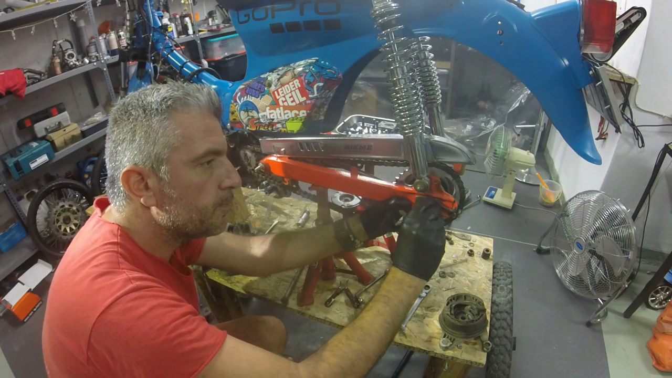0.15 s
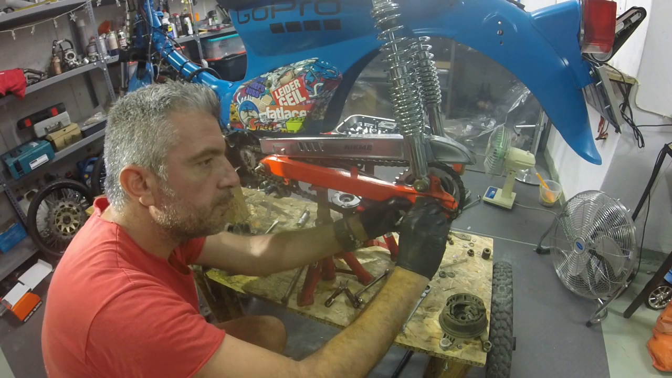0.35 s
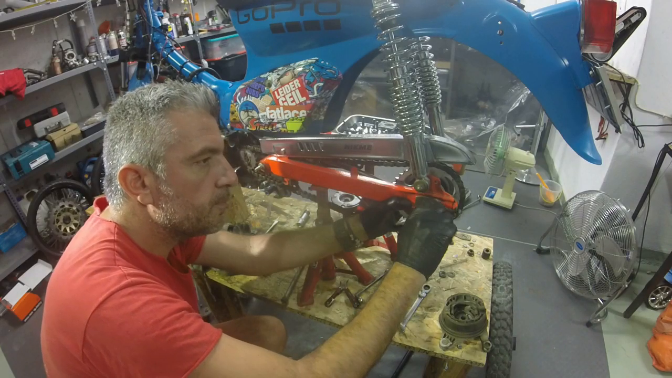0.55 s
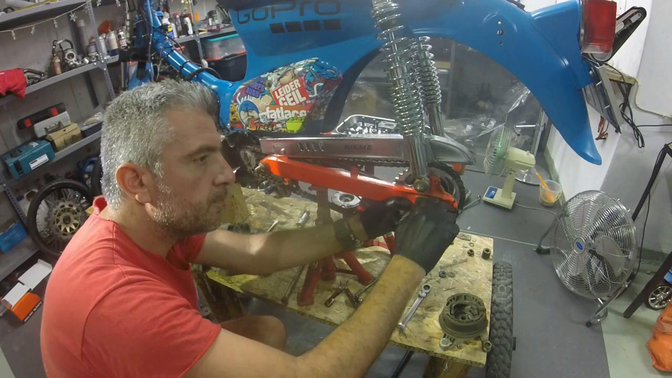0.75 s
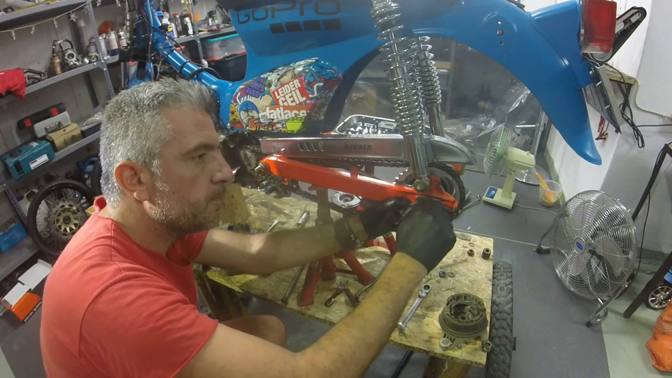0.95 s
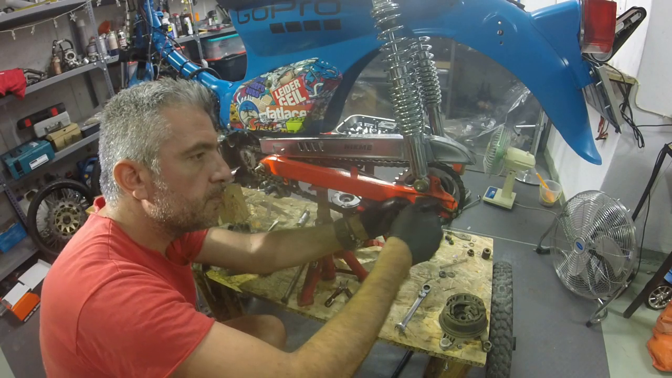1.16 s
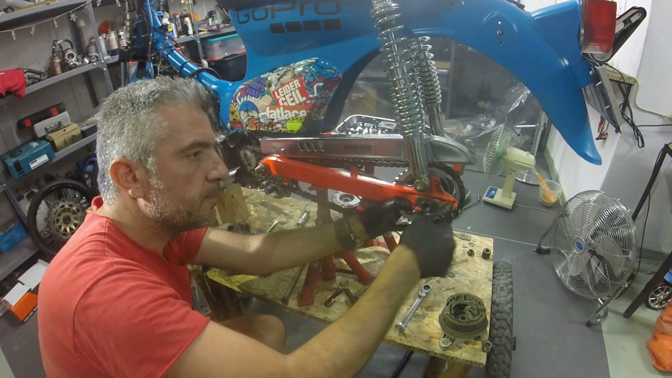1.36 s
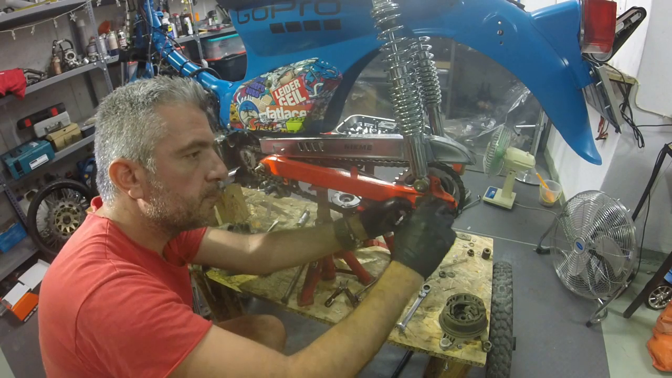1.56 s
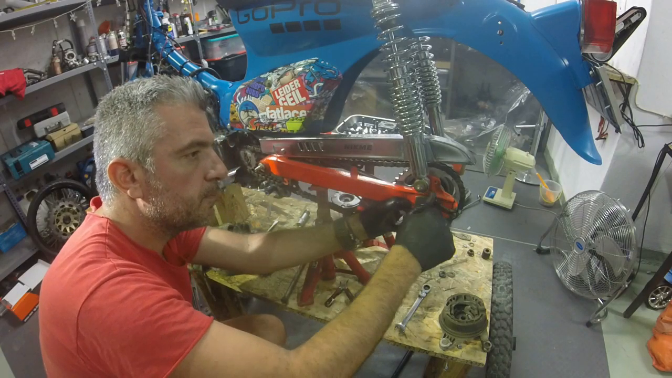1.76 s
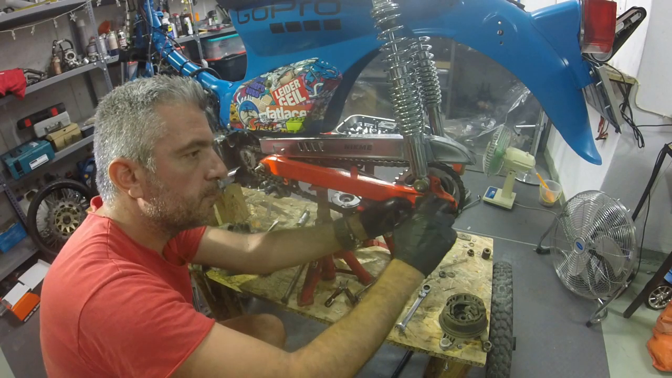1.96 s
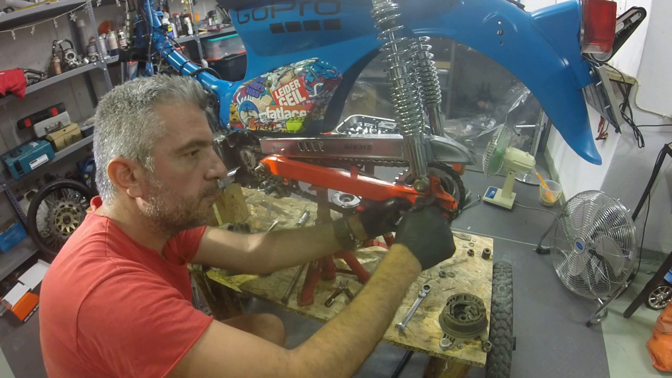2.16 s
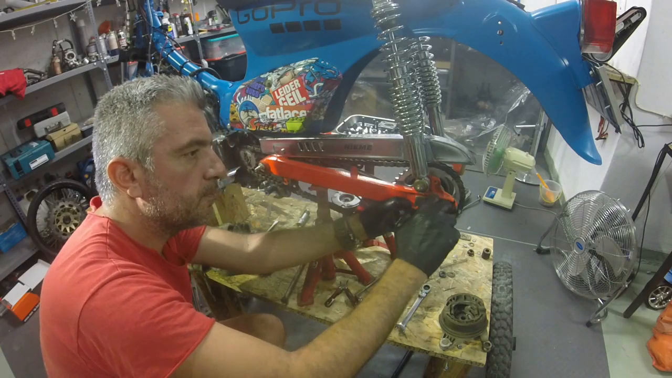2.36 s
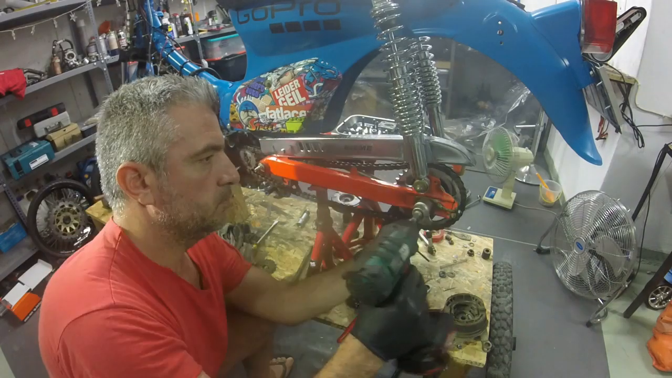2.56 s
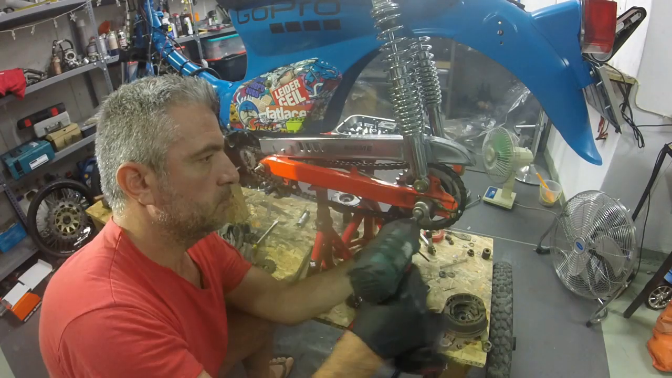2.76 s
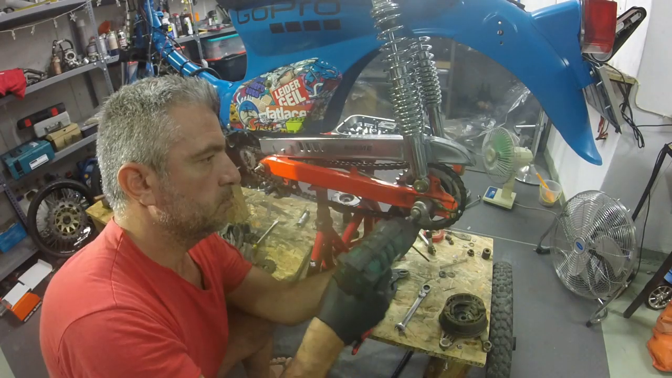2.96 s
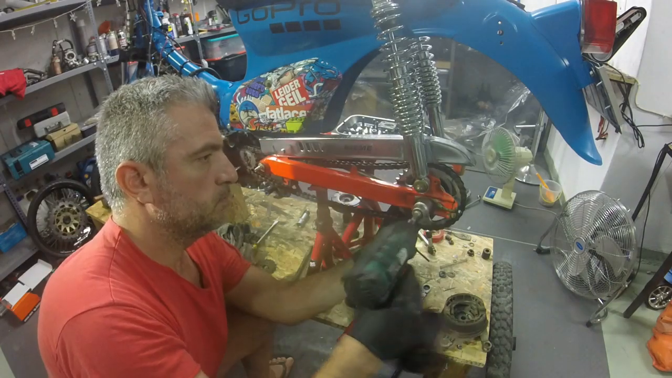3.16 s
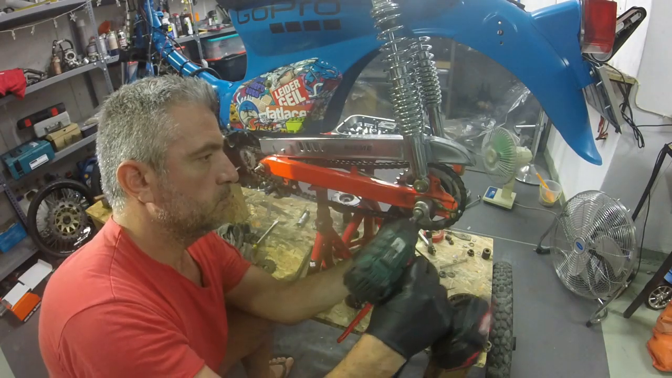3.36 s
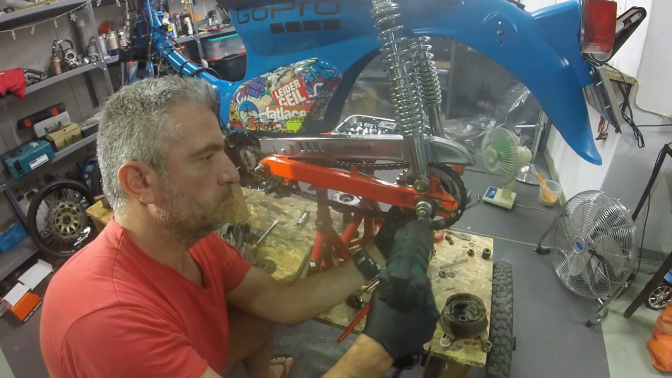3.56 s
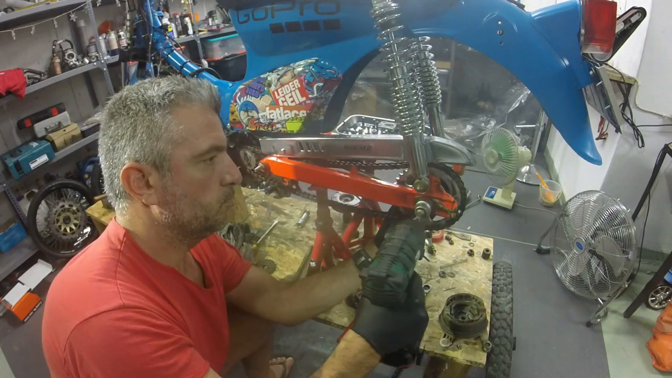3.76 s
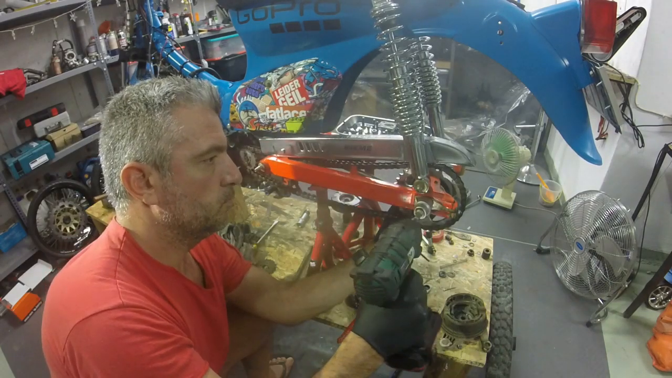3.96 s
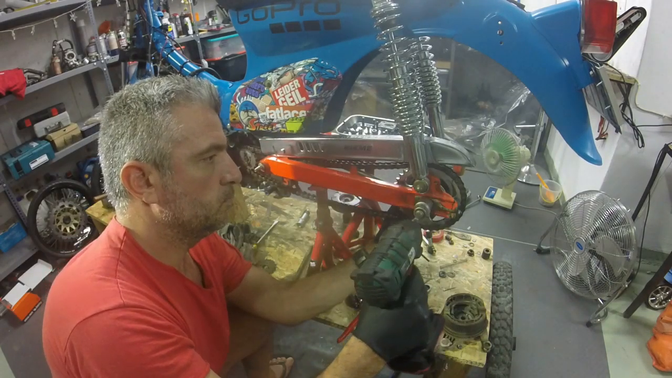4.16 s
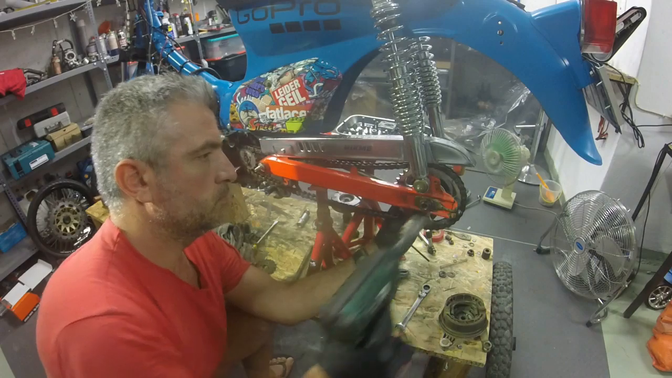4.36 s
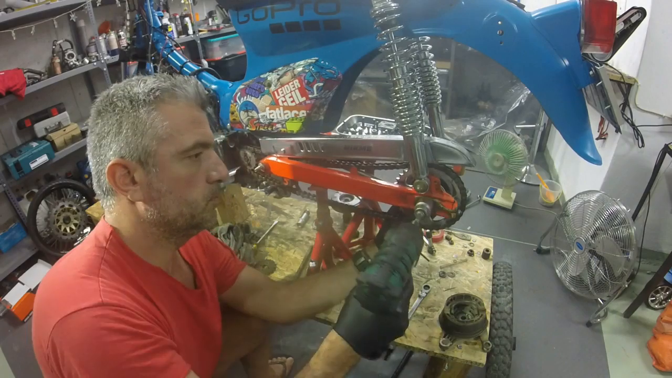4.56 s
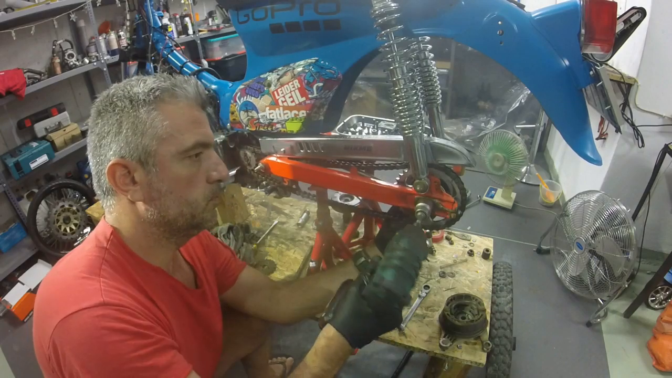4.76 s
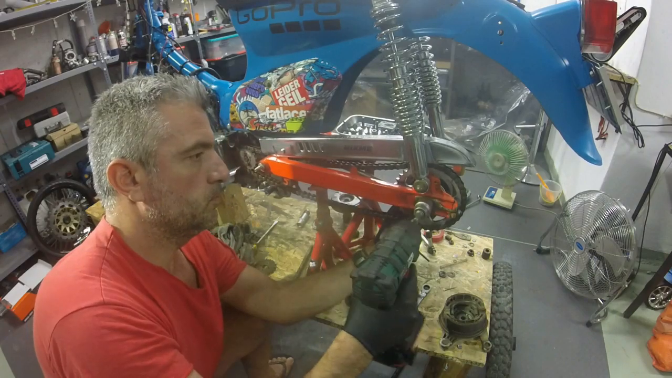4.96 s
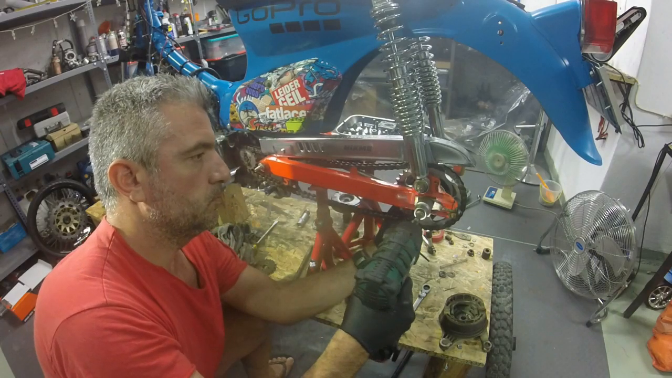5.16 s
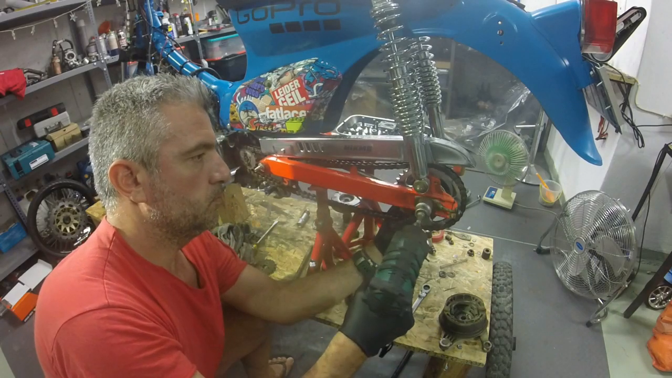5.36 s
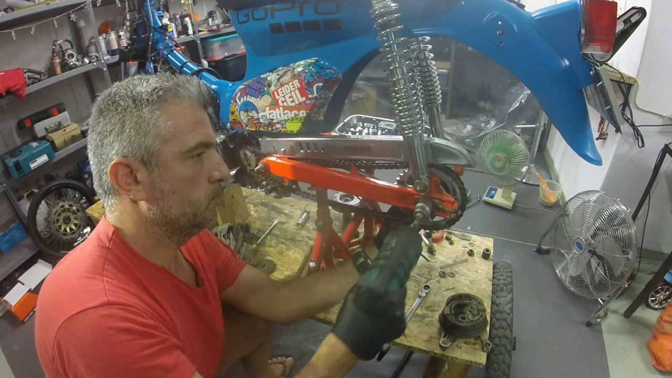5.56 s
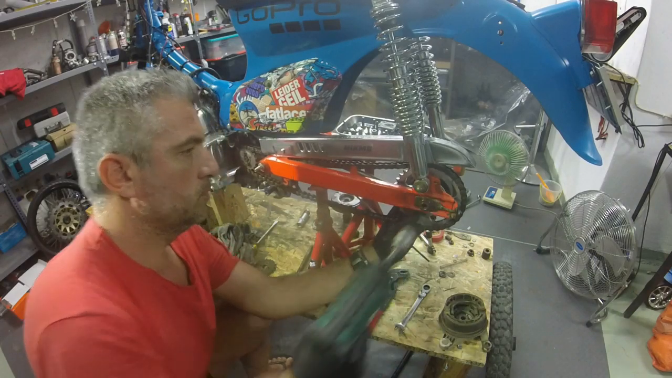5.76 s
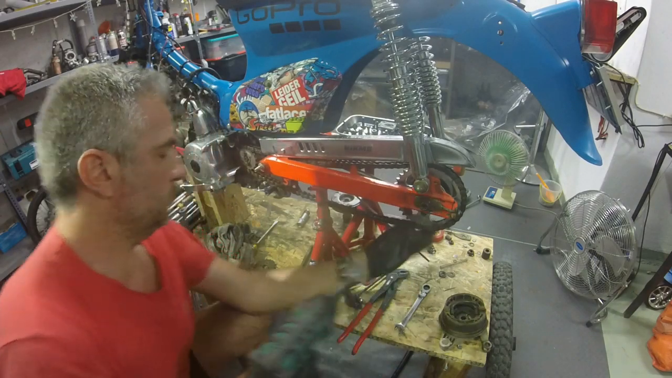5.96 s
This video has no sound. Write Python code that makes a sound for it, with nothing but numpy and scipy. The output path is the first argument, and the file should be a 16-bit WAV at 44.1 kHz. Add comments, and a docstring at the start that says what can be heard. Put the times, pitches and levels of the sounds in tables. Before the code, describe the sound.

A spanner snaps sharply on a motorcycle chain adjuster, with light ticks, faint scrapes and one bright clink. A cordless impact wrench knocks against the axle nut and fires a very short, loud burst of steel hammering with whirring gears. The socket clacks on again and a second brief burst follows. Metal parts ring after each, the hard workshop walls echo the cracks, and a fan runs quietly behind.

```python
"""A cordless impact wrench hammers twice, briefly, on the rear axle nut of a small motorcycle.
Its gears whirr, each blow cracks steel on steel, and the swingarm and wheel ring on.
Before that, a spanner clicks and scrapes on the chain adjuster; ahead of each burst the wrench
knocks about as it is fitted on the nut. The hard walls of the workshop throw back the cracks,
and a fan runs in the background."""
import sys
import numpy as np
from scipy import signal
from scipy.fft import rfft, irfft
from scipy.io import wavfile
from scipy.ndimage import uniform_filter1d

SR = 44100
rng = np.random.default_rng(int(sys.argv[2]) if len(sys.argv) > 2 else 0)


def inscribe(sig):
    """Save sig as 16-bit PCM at rate SR to the path in sys.argv[1].

    A 1-D sig is mono; a 2-D sig holds one channel per row.
    Samples are clipped to [-1, 1] before scaling.
    """
    pcm = np.round(np.clip(np.atleast_2d(sig).T, -1, 1) * 32767)
    wavfile.write(sys.argv[1], SR, pcm.astype(np.int16))


N = 265482
TIME = np.arange(N) / SR

# the wrench knocks against nut and swingarm: start_s, level_db, t60_s, tilt_db_per_octave
WRENCH_KNOCKS = [(2.836, -35, 0.025, 2.5), (3.223, -32, .06, 4), (3.2342, -20, 0.038, 0.3),
                 (3.2375, -19.5, 0.049, -0.7), (3.292, -28, 0.019, -2), (3.4437, -28.5, 0.037, -0.2),
                 (3.4695, -38, .04, 1), (3.504, -29, .025, -2.3), (3.645, -43.5, .035, .8),
                 (4.5515, -33, 0.077, 1), (4.728, -26, 0.034, -0.5), (4.753, -21, 0.027, 0),
                 (4.764, -31, .04, -3)]


def from_db(db):
    """Decibels to gain."""
    return 10 ** (np.asarray(db) / 20)


def rms_one(x):
    """Scale to unit rms."""
    return x / np.sqrt(np.mean(x ** 2) + 1e-20)


def in_time(points):
    """Draw an automation curve through (time_s, value) points."""
    return np.interp(TIME, *np.transpose(points))


def at_hz(points, hz):
    """Read (freq_hz, value) points on a log-frequency axis."""
    freq_hz, value = np.transpose(points)
    return np.interp(np.log(np.maximum(hz, 1)), np.log(freq_hz), value)


def swell(centre_s, width_s):
    """A bell-shaped rise and fall around a moment."""
    return np.exp(-((TIME - centre_s) / width_s) ** 2)


def response(colour, tilt_db=0, size=4096):
    """Minimum-phase pulse of unit energy from an EQ curve, tilted by tilt_db per octave."""
    hz = np.maximum(np.fft.rfftfreq(size, 1 / SR), 20)
    octaves = np.log2(hz / 2000)
    cepstrum = irfft(np.log(from_db(at_hz(colour, hz) + tilt_db * octaves)))
    cepstrum[1:size // 2] *= 2
    cepstrum[size // 2 + 1:] = 0
    return rms_one(irfft(np.exp(rfft(cepstrum)))) / np.sqrt(size)


def coloured(x, colour):
    """Pass a signal through an EQ curve and scale to unit rms."""
    return rms_one(signal.fftconvolve(x, response(colour))[:N])


def strikes(events, colour, gain_db, split_hz=6500, treble_life=0.66, size=4096):
    """Each contact is a crack of countless short-lived modes; the highest die soonest."""
    track = np.zeros(N)
    low_pass = signal.butter(2, split_hz, fs=SR, output="sos")
    for start_s, level_db, t60_s, tilt_db in events:
        noise = rng.choice([-1., 1.], size)
        body = signal.sosfiltfilt(low_pass, noise)
        fall_db = -60 * TIME[:size] / t60_s
        crack = body * from_db(fall_db) + (noise - body) * from_db(fall_db / treble_life)
        # the noise burst's spectrum is smoothed, so each crack keeps a steady tone
        power = uniform_filter1d(np.abs(rfft(crack)) ** 2, size=25)
        crack = irfft(rfft(crack) * np.sqrt(power.mean() / power))[:size // 2]
        hit = from_db(level_db + gain_db) * signal.fftconvolve(crack, response(colour, tilt_db))
        start = round((start_s + .0009) * SR)
        track[start:start + len(hit)] += hit[:N - start]
    return track


def ringing(events, modes, gain_db, spread_db):
    """Contacts set long modes ringing; spread_db varies each mode's strength from hit to hit."""
    track = np.zeros(N)
    start_s, hit_db = np.transpose(events)[:2]
    starts = np.round(start_s * SR).astype(int)
    chance_db = spread_db * rng.standard_normal((len(events), len(modes)))
    for k, (pitch_hz, mode_db, t60_s) in enumerate(modes):
        kicks = np.full(N, 1e-18)
        kicks[starts] = (-1) ** k * from_db(hit_db + mode_db + gain_db + chance_db[:, k])
        radius, angle = from_db(-60 / (t60_s * SR)), 2 * np.pi * pitch_hz / SR
        track += signal.lfilter([0, np.sin(angle)], [1, -2 * radius * np.cos(angle), radius ** 2], kicks)
    return track


def fan(air_db=-57, drone_trim_db=-4, drone_hz=54, width_hz=4.5):
    """The background bed: a steady rush of air and a wavering low drone."""
    # spectrum of fan and room air: freq_hz, level_db
    air_colour = [(12, -46.5), (20, -14), (38, -7.5), (58, -6), (88, -9.5), (293, -14.5), (446, -19),
                  (590, -17), (759, -20.5), (849, -20), (2390, -27), (3950, -31.5), (4420, -31.5),
                  (13900, -49), (16000, -54)]
    # the drone swells and dips: time_s, level_db
    drone_levels = [(0.05, -67), (0.44, -56), (1.09, -55), (1.14, -71), (1.42, -54), (1.92, -59),
                    (2.09, -54), (2.72, -69), (3.49, -53), (3.86, -68), (3.89, -55), (4.69, -71.5),
                    (4.81, -63), (5.79, -72), (5.9, -63.5)]
    hz = np.fft.rfftfreq(N, 1 / SR)
    air = irfft(rfft(rng.standard_normal(N)) * from_db(at_hz(air_colour, hz)), N)
    drone = irfft(rfft(rng.standard_normal(N)) / (1 + ((hz - drone_hz) / width_hz) ** 4), N)
    return from_db(air_db) * rms_one(air) + from_db(in_time(drone_levels) + drone_trim_db) * rms_one(drone)


def workshop(send, predelay_s=0.0028, early_db=8, early_t60_s=0.17, size=52000):
    """Early reflections from bench and floor, then a diffuse tail whose treble dies first."""
    # decay of the room: freq_hz, t60_s
    decay_times = [(100, .5), (300, 1.12), (700, 0.92), (2000, 0.94), (4000, 0.8555), (8000, 0.5),
                   (15000, 0.43)]
    # tone of the reverb: freq_hz, level_db
    colour = [(100, 6.5), (700, 1.5), (2000, -0.54), (4000, -6.5), (8000, 1), (15000, -1)]
    t, hz = TIME[:size], np.fft.rfftfreq(size, 1 / SR)
    centres_hz = np.geomspace(60, 16000, 12)
    white, tail = rfft(rng.standard_normal(size)), 0
    early = from_db(early_db - 60 * t / early_t60_s)
    for centre_hz, share in zip(centres_hz, np.eye(len(centres_hz))):
        band = irfft(white * at_hz(np.column_stack([centres_hz, share]), hz), size)
        late = from_db(-60 * t / at_hz(decay_times, centre_hz))
        tail += band * np.hypot(late, early) * from_db(at_hz(colour, centre_hz))
    fade_in = np.clip(t / predelay_s - 1, 0, 1)
    return signal.fftconvolve(send, rms_one(tail * fade_in) / np.sqrt(size))[:N]


def handling(slips_per_s=900, slip_spread_db=1.5, steady_rub_db=-72, grip_db=-64):
    """Steel rubs in tiny slips; gloves and the wrench body bump softly."""
    # steel slides on steel: centre_s, width_s, level_db, tilt_db_per_octave
    scrapes = [(.015, 0.068, -61, 1.5), (1.28, .04, -58, -5), (1.72, 0.077, -64, 1.5),
               (2.08, 0.094, -70.5, 2.5), (2.35, 0.031, -58.5, -3.5), (2.46, 0.06, -66.5, 3),
               (4.61, .08, -53, -3)]
    # gloves and wrench body shift: centre_s, width_s, level_db
    shifts = [(2.4, 0.025, -59), (2.75, .2, -63), (3.21, .04, -53), (3.46, .13, -56), (4.6, .1, -57.5)]
    # gritty tone of the rubbing: freq_hz, level_db
    rub_colour = [(300, -6.5), (1500, 4), (3000, 0), (4100, 2), (5500, -5), (9000, -15.5), (15000, -36)]
    # dull tone of the bumps: freq_hz, level_db
    bump_colour = [(30, -1), (130, -1), (300, -1), (700, -8), (2000, -19.5), (8000, -46.5)]
    slips = (rng.random(N) < slips_per_s / SR) * rng.choice([-1, 1], N)
    slips = rms_one(slips * from_db(-slip_spread_db * rng.standard_normal(N)))
    rub = from_db(steady_rub_db) * coloured(slips, rub_colour)
    for centre_s, width_s, level_db, tilt_db in scrapes:
        slide = slips * swell(centre_s, width_s)
        rub += from_db(level_db) * signal.fftconvolve(slide, response(rub_colour, tilt_db))[:N]
    movement = from_db(grip_db) + sum(from_db(db) * swell(s, width_s) for s, width_s, db in shifts)
    return rub + movement * coloured(rng.standard_normal(N), bump_colour)


def light_ticks(t60_s=0.023):
    """Tools and chain touch lightly, each time with a short tick."""
    # light contacts: start_s, level_db, tilt_db_per_octave
    touches = [(1.1246, -36, -5), (1.377, -47, 1), (1.954, -38, -1.5), (2.041, -47, 9), (2.0894, -52, 9),
               (2.331, -34, -2.5), (2.351, -33.5, -4), (2.416, -37.5, -4.5), (2.7587, -41.5, 2),
               (2.871, -40.5, -3), (3.077, -42.5, -3.5), (3.1141, -38.5, 0), (3.1313, -36.5, -3),
               (3.384, -41.5, -4.5), (4.8517, -42, -2.5), (5.087, -45, -1.5)]
    # tone of a tick: freq_hz, level_db
    colour = [(100, -3), (700, 4.5), (2200, 2.5), (4200, 6.5), (7000, -4.5), (14000, -25.5)]
    return strikes([(s, db, t60_s, tilt_db) for s, db, tilt_db in touches], colour, gain_db=-5)


def adjuster_snaps():
    """The spanner snaps on the chain adjuster, which rings briefly: (crack, ring)."""
    # a tight double click: start_s, level_db, t60_s, tilt_db_per_octave
    snaps = [(0.895, -16, 0.014, 0), (0.898, -19, 0.011, -0.6)]
    # tone of a snap: freq_hz, level_db
    colour = [(80, -25), (350, -5.5), (720, 0), (1150, -5), (1600, -4.5), (2600, -9.5), (3800, 2),
              (5000, -8.5), (7000, -8.5), (10000, -18), (15500, -31)]
    # resonances of the adjuster: pitch_hz, level_db, t60_s
    modes = [(743, -14.5, 0.066), (1510, -18, .12), (3220, -21, 0.25), (3670, -15, .16), (3850, 3, .035),
             (4040, -26, 0.4)]
    return strikes(snaps, colour, gain_db=-5), ringing(snaps, modes, gain_db=-15, spread_db=1)


def spanner_clinks():
    """The steel spanner clinks and rings brightly: (crack, ring)."""
    # one clear clink, one faint: start_s, level_db, t60_s, tilt_db_per_octave
    clinks = [(2.2887, -20.5, 0.014, 2.5), (2.452, -50, 0.056, 1)]
    # tone of a clink: freq_hz, level_db
    colour = [(100, -24), (400, -8), (700, 3.5), (1100, -1), (1600, 2.5), (2600, -8.5), (3700, 1),
              (4700, 1.5), (5700, -17.5), (8000, -19.5), (11000, -33), (15500, -34)]
    # resonances of the spanner: pitch_hz, level_db, t60_s
    modes = [(1260, -13.5, 0.19), (3670, -2.5, 0.072), (4180, -6, .05), (4260, -14, 0.26), (4690, 2, .04),
             (4830, -5, .04), (6950, -19.5, 0.14), (8900, -18.5, 0.24), (9060, -17, 0.17),
             (12000, -26, .15), (14550, -21, .07)]
    return strikes(clinks, colour, gain_db=-4.5), ringing(clinks, modes, gain_db=-14, spread_db=1)


def wheel_ring():
    """Jolts reach the wheel and leave a low, lingering ring."""
    # jolts through the axle: start_s, level_db
    jolts = [(3.235, -17), (3.975, -14), (5.24, -7.5)]
    # resonances of the wheel: pitch_hz, level_db, t60_s
    modes = [(126.3, 2, 0.28), (308, 0.5, 0.79), (544, -18.5, 7.1), (843, -16.5, 2.4)]
    return ringing(jolts, modes, gain_db=-28, spread_db=0)


def swingarm_ring(blows):
    """Hammer blows and knocks of the wrench set the swingarm ringing."""
    # resonances of the swingarm: pitch_hz, level_db, t60_s
    modes = [(364.5, -14.5, 0.47), (485, -13, 0.53), (663, -4.5, .55), (905, -10.5, 0.76),
             (950, -8.5, 0.49), (1078, -12, 0.67), (1219, -10.5, 0.69), (1310, -25, .7), (1407, -12, .25),
             (1730, -8, 0.64), (1840, -4, 0.19), (2220, -6.5, .3), (2238, -6.5, 0.51), (2530, -9.5, 0.5),
             (2840, -12.5, 0.35), (3420, -8.5, .22), (3340, -0.5, 0.19), (4050, -12.5, .2),
             (4308, -7.5, 0.25)]
    hammered = ringing(blows, modes, gain_db=-34.5, spread_db=2)
    return hammered + ringing(WRENCH_KNOCKS, modes, gain_db=-29, spread_db=2)


def wrench_knocks():
    """The wrench clunks against nut and swingarm as it is fitted."""
    # tone of a knock: freq_hz, level_db
    colour = [(40, -9), (130, -4), (300, -5), (650, 5.5), (1200, -1), (1800, -2.5), (2400, 0), (3000, -6),
              (3900, -7), (6500, -17.5), (9000, -29), (15000, -47.5)]
    return strikes(WRENCH_KNOCKS, colour, gain_db=-5)


def socket_drops():
    """The socket drops onto the nut with a clack and a short ring: (crack, ring)."""
    # socket meets nut: start_s, level_db, t60_s, tilt_db_per_octave
    drops = [(4.6677, -15.5, 0.054, 3), (4.672, -22.5, 0.078, -2), (4.682, -14.5, 0.034, -0.9),
             (5.2028, -18.5, .012, 3.5)]
    # tone of a clack: freq_hz, level_db
    colour = [(60, -20), (350, -17), (700, 6), (1200, -4), (2000, 1), (2700, -5), (3400, 3.5), (4500, -.5),
              (5500, -13.5), (7500, -15), (11000, -32.5), (12800, -23.5), (15500, -37.5)]
    # resonances of the socket: pitch_hz, level_db, t60_s
    modes = [(683, -6.5, 0.13), (1935, 1.5, 0.15), (3370, 6.5, .08), (3630, 2, .1), (4400, 2.5, .1),
             (12170, -20, 0.13), (13000, -25.5, 0.11), (13900, -21.5, 0.1)]
    return strikes(drops, colour, gain_db=-7), ringing(drops, modes, gain_db=-23, spread_db=2.5)


def motor():
    """The motor spins up, strains to wind the hammer spring, hammers and coasts: (mesh_hz, gain)."""
    # trigger pulls: pull_s, resist_s, release_s, free_running_db
    pulls = [(3.838, 3.888, 4.025, -29.5), (5.188, 5.233, 5.36, -37)]
    idle_hz, free_hz, loaded_hz = 302.3, 1076.4, 883.3  # gear mesh rates
    attack_s, bite_s, strain_s, coast_s = 0.013, 0.0051, .03, .09
    strain_db, hammering_db, off_db = -23.5, -31.5, -60
    speed, gain = [], 0
    for pull_s, resist_s, release_s, free_db in pulls:
        hammer_s, stop_s = resist_s + 2 * strain_s, release_s + coast_s
        speed += [(pull_s, idle_hz), (resist_s, free_hz), (hammer_s, loaded_hz),
                  (release_s, loaded_hz), (stop_s, idle_hz)]
        level_db = in_time([(pull_s, off_db), (pull_s + attack_s, free_db), (resist_s - bite_s, free_db),
                            (resist_s, strain_db), (resist_s + strain_s, strain_db),
                            (hammer_s, hammering_db), (release_s, hammering_db), (stop_s, off_db)])
        gain += from_db(level_db) * (TIME > pull_s) * (TIME < stop_s)
    return in_time(speed), gain


def gears(gain_db=-2, jitter=.12, grind=1.11):
    """Gear teeth mesh at the wavering motor speed, with grinding between them."""
    # tone of the gearbox: freq_hz, level_db
    colour = [(50, -18.5), (150, -18.5), (320, -6), (700, -6.5), (1200, -1), (2800, 0), (4500, -5),
              (8000, -17), (15000, -34.5)]
    mesh_hz, envelope = motor()
    waver = rms_one(uniform_filter1d(rng.standard_normal(N), size=200))
    teeth_passed = np.floor(np.cumsum(mesh_hz * (1 + jitter * waver)) / SR)
    ticks = np.diff(teeth_passed, prepend=0) * from_db(3.2 * rng.standard_normal(N))
    # the housing smears each tooth's tick over a few milliseconds
    housing = rng.standard_normal(300) * np.hanning(300)
    whirr = rms_one(signal.fftconvolve(ticks - ticks.mean(), housing)[:N])
    return envelope * from_db(gain_db) * coloured(whirr + grind * rng.standard_normal(N), colour)


def hammer_blows(t60_s=0.028, tilt_db=0.25, level_spread_db=.5, tilt_spread_db=.9, lag_kept=.4):
    """The hammer catches and rebounds as the socket takes up its play, then settles to an even beat."""
    # catches and rebounds: start_s, level_db, t60_s, tilt_db_per_octave
    catches = [(3.886, -11, 0.025, -1), (3.89, -2.5, 0.034, -0.5), (3.9035, -1.5, 0.01, -0.5)]
    # bursts of blows: start_s, count, interval_s, lag_s, first_db, second_db, step_db
    bursts = [(3.8983, 6, .0232, .0062, 0, -4.5, 0.5), (5.23, 5, .0276, .0118, -7, -0.5, -1.4)]
    blows = list(catches)
    for start_s, count, interval_s, lag_s, first_db, second_db, step_db in bursts:
        for k, (harder, brighter) in enumerate(rng.standard_normal((count, 2))):
            blow_s = start_s + k * interval_s + lag_s * (1 - lag_kept ** k)
            level_db = second_db + step_db * (k - 1) if k else first_db
            level_db += level_spread_db * harder
            blows.append((blow_s, level_db, t60_s, tilt_db + tilt_spread_db * brighter))
    return blows


def impact_wrench(blows):
    """Hard steel hammer cracks over the whirr of the gears."""
    # tone of a blow: freq_hz, level_db
    colour = [(50, -25), (130, -23), (220, -7.5), (380, -2.5), (650, 2.5), (1100, -3), (1850, 2.5),
              (2800, 0), (3900, 3.5), (5500, -3.5), (8000, -6.5), (11000, -14), (13000, -11),
              (16000, -26.5)]
    return strikes(blows, colour, gain_db=-6.5) + gears()


def scene():
    """Wrench, hand tools and fan, mixed in mono with the workshop reverb."""
    blows = hammer_blows()
    wrench = impact_wrench(blows)
    knocks = wrench_knocks()
    socket, socket_ring = socket_drops()
    snaps, adjuster_ring = adjuster_snaps()
    clinks, spanner_ring = spanner_clinks()
    foley = light_ticks() + handling()
    rings = swingarm_ring(blows) + wheel_ring() + socket_ring + adjuster_ring + spanner_ring
    # cracks, gear whirr and handling go to the reverb; the long rings stay dry: layer, send_db
    layers = [(wrench, -6), (knocks, -5), (socket, -5.5), (snaps + clinks, -3.5), (foley, -7)]
    direct = sum(layer for layer, _ in layers)
    send = sum(from_db(send_db) * layer for layer, send_db in layers)
    return (direct + rings + workshop(send) + fan())[None]


def record(dry, ceiling=0.76, cutoff_hz=15800):
    """Soft clipping rounds the highest peaks; a steep low-pass cuts the very top."""
    low_pass = signal.ellip(12, .1, 90, cutoff_hz, fs=SR, output="sos")
    return signal.sosfilt(low_pass, ceiling * np.tanh(dry / ceiling))


dry = scene()
out = record(dry)
inscribe(out)
```